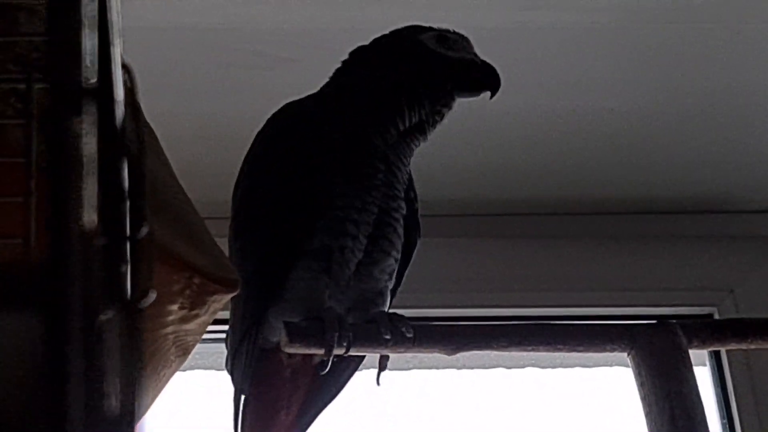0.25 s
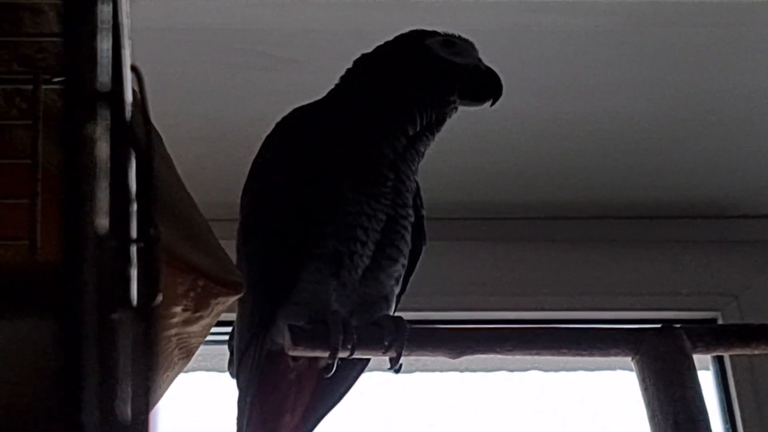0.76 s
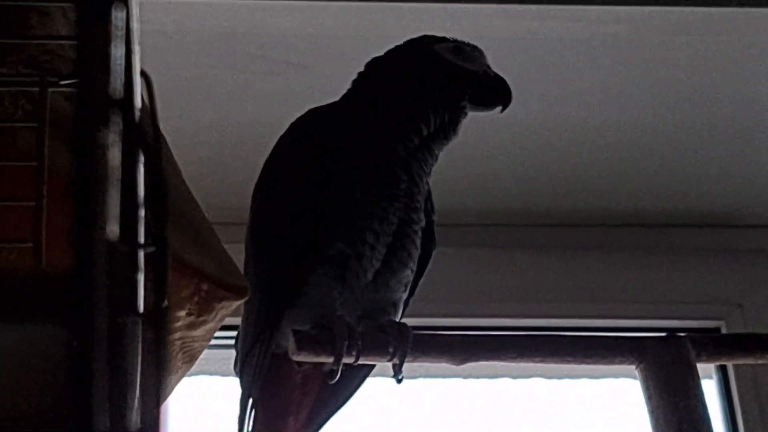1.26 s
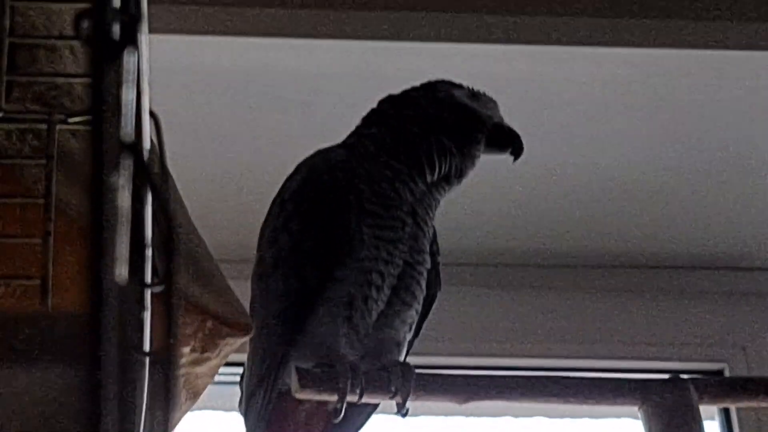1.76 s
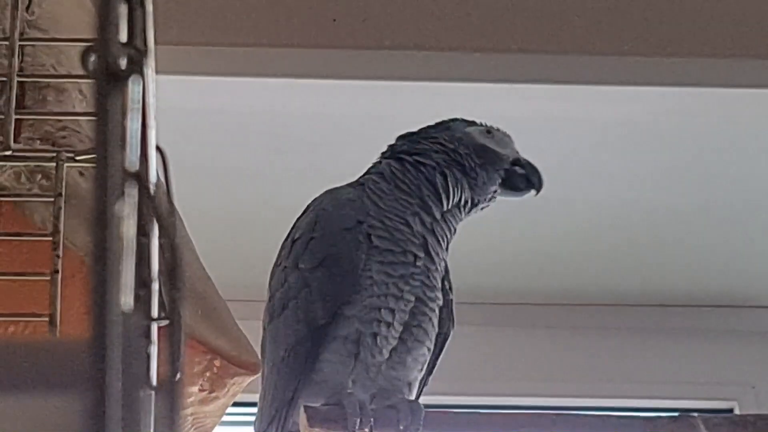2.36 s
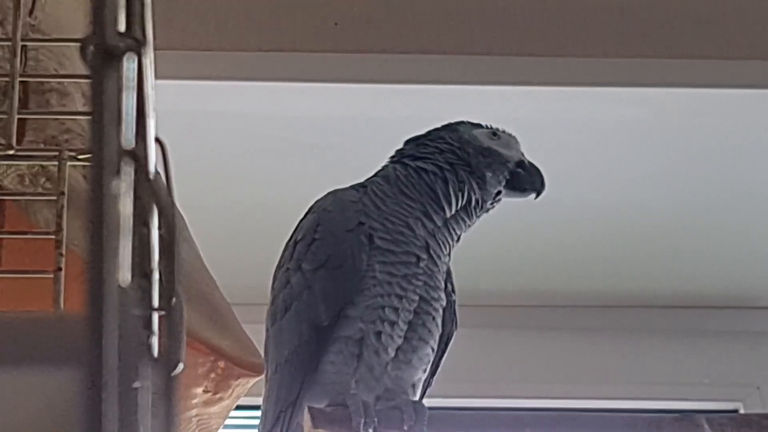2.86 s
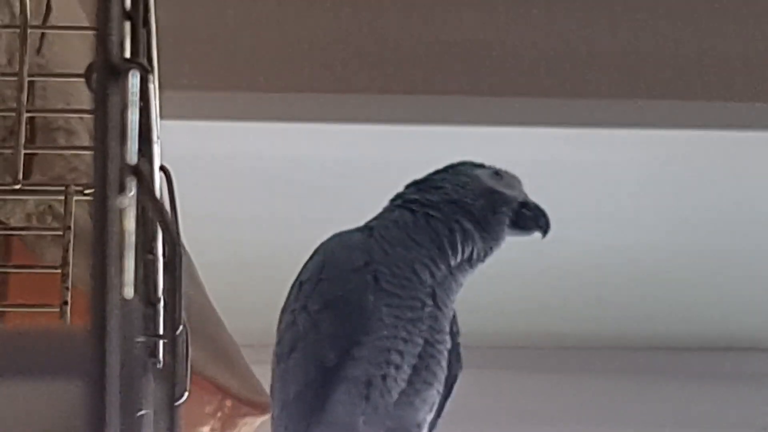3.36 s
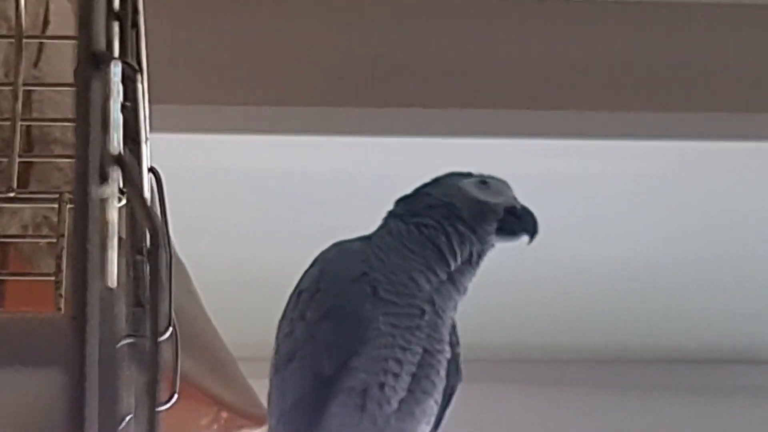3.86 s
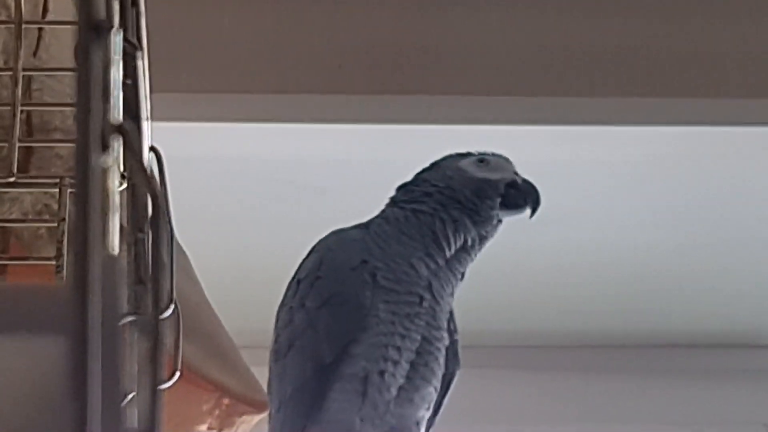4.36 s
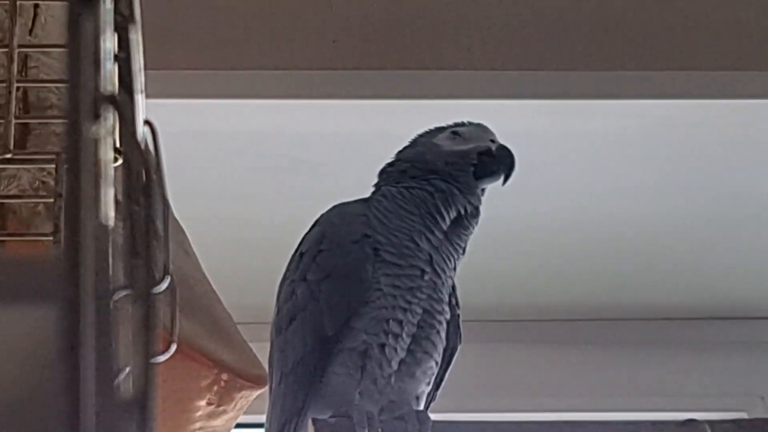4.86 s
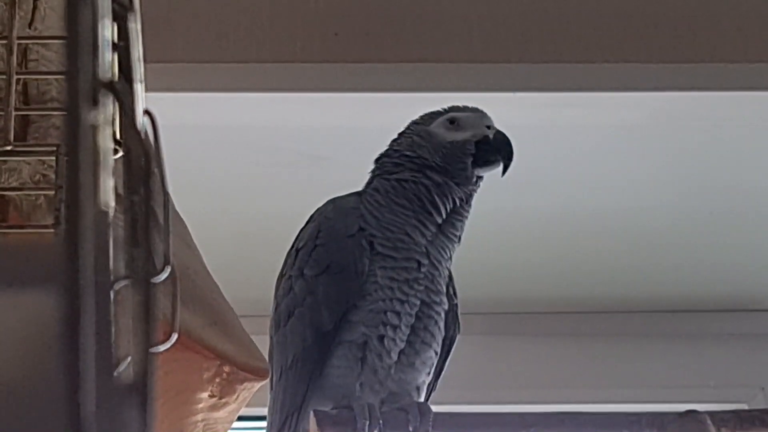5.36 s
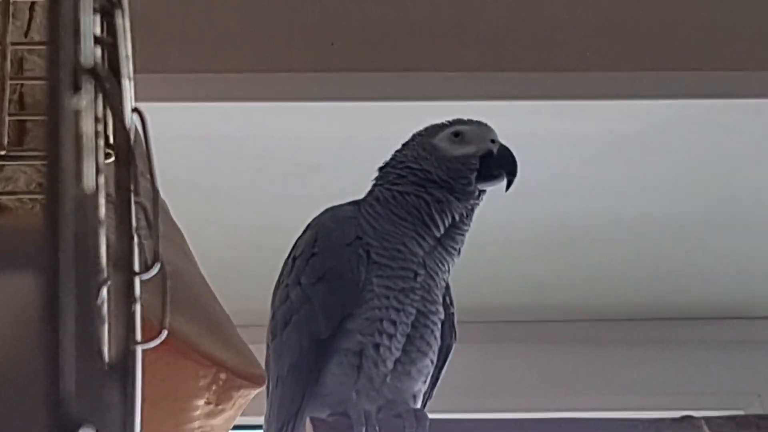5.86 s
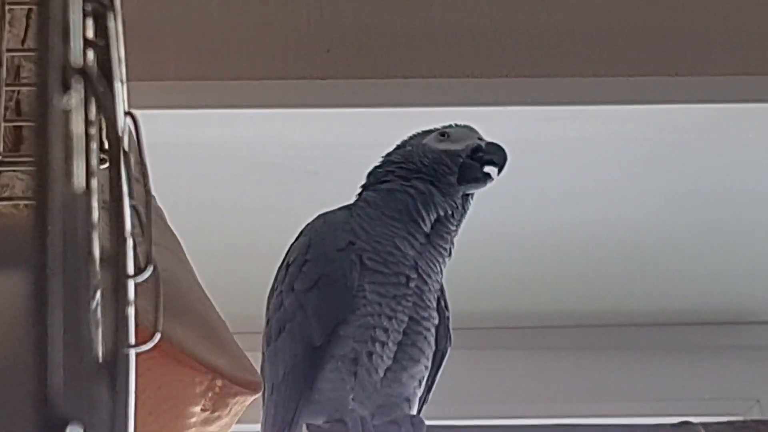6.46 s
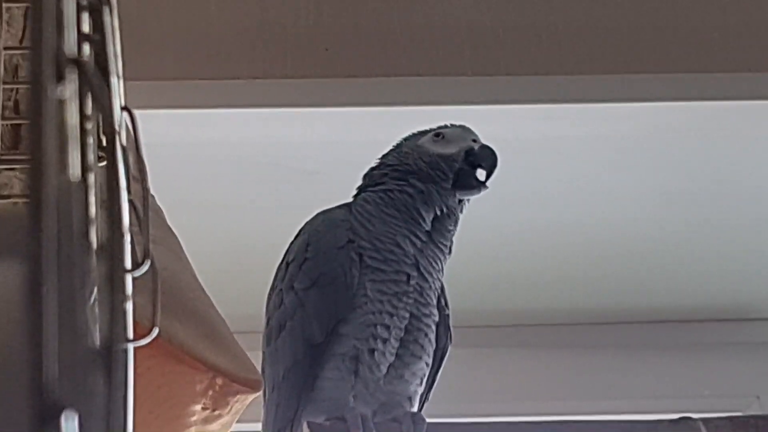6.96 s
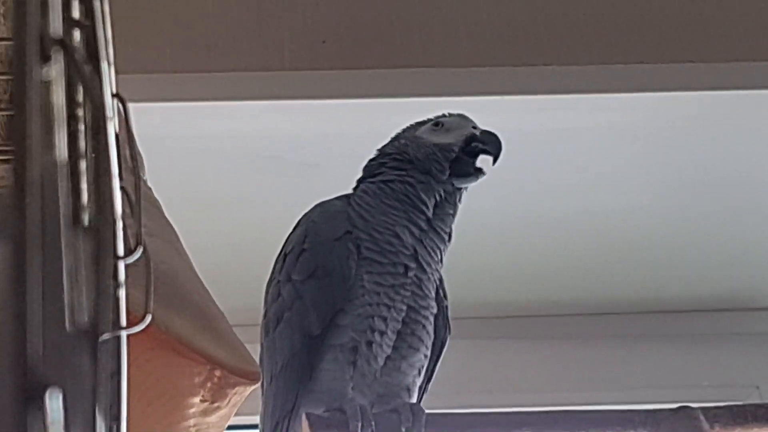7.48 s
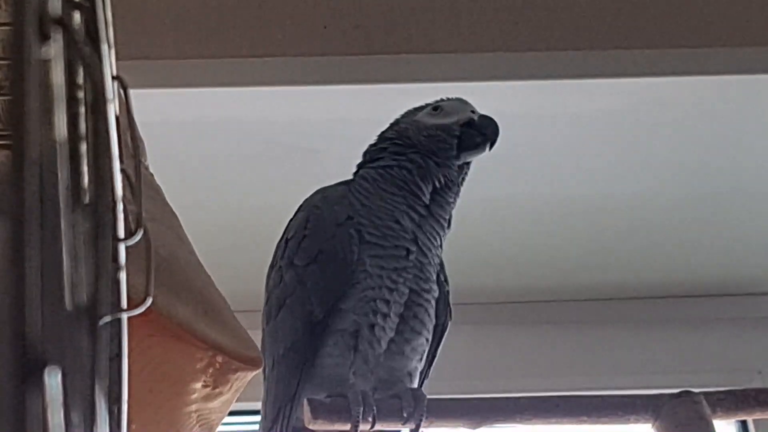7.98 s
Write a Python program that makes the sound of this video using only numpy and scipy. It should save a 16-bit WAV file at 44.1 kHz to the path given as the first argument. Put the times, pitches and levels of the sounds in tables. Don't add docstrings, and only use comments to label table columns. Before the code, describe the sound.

A grey parrot indoors gives brief gliding whistles, a piercing pure pipe, chirps, a squawk, a honk and beak clicks over faint hum and motor whine.

```python
import sys
import numpy as np
from scipy import signal
from scipy.fft import rfft, irfft, next_fast_len
from scipy.io import wavfile
from scipy.ndimage import uniform_filter1d, minimum_filter1d, map_coordinates

SR = 44100
rng = np.random.default_rng(int(sys.argv[2]) if len(sys.argv) > 2 else 0)


def to_linear_factor(level_db):
    exponent = np.asarray(level_db, float) / 20
    return 10 ** exponent


def generate_wav(sig):
    pcm = np.round(np.clip(np.atleast_2d(sig).T, -1, 1) * 32767).astype(np.int16)
    wavfile.write(sys.argv[1], SR, pcm)


N = 362634
TOP_HZ = 15740
PIPE_HZ = 2076
HZ = np.fft.rfftfreq(next_fast_len(N + SR), 1 / SR)

# (frequency [Hz], level [dB])
THROAT = [(500, 36), (1300, 0.5), (2200, 1), (3500, 0), (4300, -8), (5200, -11.5), (6400, 4.5), (7300, -2),
          (8500, -6), (12000, 2), (15500, -9)]


def unit(x):
    return x / np.sqrt(np.mean(x ** 2) + 1e-20)


def along(points, hz):
    f, v = np.transpose(points)
    return np.interp(np.log(hz + 1), np.log(f + 1), v)


def filtered(x, response):
    m = next_fast_len(N + SR)
    return irfft(rfft(x, m) * response, m)[..., :N]


def wobble(rate, size=N):
    knots = rng.standard_normal(int(size * rate / SR) + 4)
    return map_coordinates(knots, [np.arange(size) * rate / SR])


def panned(x, pan_db):
    return np.array([x * to_linear_factor(pan_db / 2), x * to_linear_factor(-pan_db / 2)])


def syrinx(notes, tract, slope_db, jitter, edge, most_air_db=np.inf, smear=0.018, flicker_db=3,
           reach=((0, 1, 0),), odd_db=4.0):
    out, airflow = np.zeros((2, N)), np.zeros((2, N))
    k = np.arange(3, 26)[:, None]
    for note in notes:
        s, *cols = np.transpose(note)
        a = round(s[0] * SR)
        t = np.arange(a, round(s[-1] * SR)) / SR
        since = t - s[0]
        hz, db, octave_db, over_db, air_db, pan_db = [np.interp(t, s, c) for c in cols]
        hz = hz * (1 + jitter * map_coordinates(rng.standard_normal(200), [since * 600]))
        phase = 2 * np.pi * np.cumsum(hz) / SR

        uneven_db = odd_db * rng.standard_normal(k.shape)
        stretch, lift_db = [row[1:] for row in reach if row[0] <= s[0]][-1]
        tract_db = along(tract, k * hz / stretch) + slope_db * np.log2(k / 2)
        over = to_linear_factor(over_db + lift_db + tract_db + uneven_db) * (k * hz < TOP_HZ)
        knots = np.broadcast_arrays(np.arange(len(k) + 1)[:, None], since * 50)
        flicker = to_linear_factor(flicker_db * map_coordinates(rng.standard_normal((len(k) + 1, 20)), knots))
        rasp = map_coordinates(rng.standard_normal(200), [since * 500])
        octave = to_linear_factor(octave_db) * flicker[0] * np.sin(2 * (phase + smear * rasp))
        overtones = np.sum(over * flicker[1:] * np.sin(k * (phase + smear * rasp * k / 3)), axis=0)
        tone = to_linear_factor(120 * jitter * rasp) * (np.sin(phase) + octave + overtones)

        fade = np.clip(np.minimum(since, s[-1] - t) / edge, 0, 1)
        hiss = to_linear_factor(db + np.minimum(air_db, most_air_db)) * fade
        out[:, a:a + len(t)] += panned(to_linear_factor(db) * fade * np.sqrt(2) * tone, pan_db)
        airflow[:, a:a + len(t)] += panned(hiss, pan_db)
    air = unit(filtered(rng.standard_normal(N), to_linear_factor(along(tract, HZ)) * (HZ > 1300)))
    return out + airflow * air


def voiced(notes, octave_db, over_db, air_db, pan_db, grow=0.6, opens_s=None):
    # (frequency [Hz], level [dB])
    mouth = [(700, 16), (1300, 3.5), (1900, 4.5), (2400, -1), (2800, 10), (3400, -28.5), (4200, 1),
             (6000, 0.5)]
    out = []
    for note in notes:
        s, hz, db = np.transpose(note)
        effort_db = grow * (db - db.max())
        opening = (s - s[0]) / (opens_s or s[-1] - s[0])
        second_db, upper_db, hiss_db = [
            np.interp(opening, np.linspace(0, 1, np.size(v)), np.atleast_1d(v))
            for v in (octave_db, over_db, air_db)]
        second_db = second_db + effort_db + along(mouth, 2 * hz)
        out.append(np.transpose([s, hz, db, second_db, upper_db + effort_db, hiss_db, pan_db + 0 * s]))
    return out


def sung(rows, bend, peak_at, swell_db, fade_db, **voice):
    u = np.linspace(0, 1, 25)
    level_db = np.interp(u, [0, peak_at, 1], [-swell_db, 0, -fade_db])
    return voiced([np.transpose([s + length * u, first * (last / first) ** u ** bend, db + level_db])
                   for s, length, first, last, db in rows], **voice)


def background():
    # (frequency [Hz], level [dB])
    air_colour = [(12, -36), (20, -11), (106, -11), (180, -5), (273, -3.5), (341, -6.5), (629, -9.5),
                  (808, -10.5), (1300, -15.5), (1810, -13.5), (2200, -18), (4290, -22.5), (7070, -28),
                  (9600, -29), (15400, -40.5)]
    # (frequency [Hz], left-right likeness [0..1])
    alike = [(30, 0.39), (60, 1), (180, 0.95), (550, 0.55), (1650, 0), (4970, 0.2), (15000, 0)]
    # (frequency [Hz], width [Hz], level [dB])
    hums = [(52.3, 4.5, -66), (100.2, 1.16, -54), (120.7, 3.7, -54.5), (285.2, 5.9, -48), (795, 30, -54.5)]
    turn = np.arccos(np.clip(along(alike, HZ), -1, 1)) / 2
    spread = to_linear_factor(along(air_colour, HZ)) * [np.cos(turn), np.sin(turn)]
    mid, side = filtered(rng.standard_normal((2, N)), spread)
    air = to_linear_factor(-44.5 + 2.3 * wobble(5)) * unit(np.array([mid + side, mid - side]))
    lines = sum(to_linear_factor(db) * unit(1 / (1 + ((HZ - hz) / width) ** 2)) for hz, width, db in hums)
    return air + filtered(rng.standard_normal(N) + 0.034 * rng.standard_normal((2, N)), lines)


def motor(gain):
    # (time [s], speed [turns/s])
    shaft = [(0, 252), (1, 254.5), (2.2, 256.6), (4, 258.6), (8.3, 258.7)]
    # (multiple, first level [dB], middle level [dB], last level [dB], share of the drift)
    whine = [(7, -39, -57, -49.5, 1.44), (16, -58, -57.5, -64.5, 1.67), (18, -54.5, -72, -60, 0.096),
             (21, -81, -76.5, -65.5, 0.46), (36, -78, -67.5, -60.5, -1.04)]
    # (multiple, first level [dB], settled level [dB], left-right [dB])
    weak_orders = [(1.007, -93, -53.5, 13), (9, -67, -75, 22.5), (10, -62, -72, 15), (11, -105, -70, 16),
                   (14, -98, -75, 17.5), (15, -67.5, -77.5, 17), (17, -94, -86, 0), (19, -104, -78, 31),
                   (24, -79.5, -75.5, 24), (25, -80.5, -84, 27), (45, -84, -80, -23)]
    # (time [s], level [dB])
    drift = [(.1, -17), (1.1, -8), (2.2, 0), (2.85, -1.5), (3.8, -1), (4.6, 4.5), (5.7, 0), (6.7, 2),
             (7.2, 3), (8.1, -1)]
    # (frequency [Hz], left-right [dB])
    whine_facing = [(4500, 5), (9000, -10)]
    middle_level_s = 2.38
    t = np.arange(N) / SR
    phase = 2 * np.pi * np.cumsum(np.interp(t, *np.transpose(shaft))) / SR
    drift_db = np.interp(t, *np.transpose(drift))
    loud = [(k, to_linear_factor(np.interp(t, [0, middle_level_s, t[-1]], db) + share * drift_db),
             along(whine_facing, k * shaft[-1][1])) for k, *db, share in whine]
    weak = [(k, gain * to_linear_factor(np.interp(t, [0, 1], db)), pan_db) for k, *db, pan_db in weak_orders]
    out = np.zeros((2, N))
    for k, level, pan_db in loud + weak:
        apart = np.array([[0], [min(.4 * k, np.pi / 2)]])
        swelling = panned(level * to_linear_factor(1.3 * wobble(3)), pan_db)
        out += np.sqrt(2) * swelling * np.sin(round(k) * phase + apart)
    return out


def whistles():
    # (start [s], length [s], first pitch [Hz], last pitch [Hz], peak [dB])
    slides = [
        (.23, 0.045, 1565, 852, -13.5),
        (.795, 0.024, 2024, 1654, -19.5),
    ]
    droops = [
        (.625, 0.035, 1387, 1345, -16.5),
        (3.202, 0.053, 844, 738, -27),
    ]
    flicks = [
        (3.088, 0.018, 2494, 2810, -10.5),
        (3.178, 0.022, 1063, 777, -24.5),
        (3.261, 0.041, 600, 510, -37),
        (3.303, 0.0172, 946, 1310, -16.5),
        (3.428, 0.03, 974, 1480, -22.5),
    ]
    # (time [s], pitch [Hz], level [dB])
    phrases = [
        [(.37, 1180, -41), (.394, 1135, -15), (.412, 1206, -11), (.424, 1079, -12.5), (.436, 961, -6),
         (.445, 735, -17.5)],
        [(.648, 1590, -5.5), (.656, 1870, -20), (.67, 1924, -5), (.685, 1730, -16), (.7, 1682, -4),
         (.712, 1540, -19.5), (.725, 1344, -8)],
    ]
    held = [
        [(.516, 1442, -22), (.528, 1373, -19), (.546, 1429, -6.5), (.556, 1414, -9.5), (.57, 1399, 4),
         (.585, 1400, -13), (.6, 1270, -5.5)],
    ]
    low_phrases = [
        [(1.255, 1275, -39), (1.285, 1047, -18), (1.303, 996, -8), (1.322, 917, -10), (1.335, 765, -24),
         (1.352, 664, -10.5)],
        [(1.518, 1021, -32), (1.56, 979, -13.5), (1.59, 945, -15.5), (1.601, 933, -21.5), (1.624, 891, -14),
         (1.634, 898, -5.5), (1.642, 902, -5), (1.652, 847, -18.5), (1.672, 691, -14)],
        [(1.8, 710, -46), (1.845, 563, -34.5), (1.868, 453, -18.5), (1.885, 380, -35.5)],
    ]
    # (from time [s], resonance factor, overtone lift [dB])
    throat_reach = [(0, 1.08, 3), (.33, 1.05, 0.5), (.5, 1.09, -2.5), (.64, 1.07, -9), (.75, 0.84, -24),
                    (1.2, 1.06, -1.5), (1.45, 0.925, -1.5), (1.75, 2, -9.5), (2.9, 1.03, 10)]
    notes = voiced(held, octave_db=(-25, -18.5, -32), over_db=(-23.5, -27, -34.5), grow=0.292,
                   air_db=(-54, -51), pan_db=7.5)
    notes += sung(droops, bend=5.9, peak_at=0.54, swell_db=12, fade_db=-1, octave_db=-31.5,
                  over_db=-42.5, air_db=(-24, -40.5), pan_db=4.5)
    notes += sung(slides, bend=1.28, peak_at=0.43, swell_db=23.5, fade_db=2.5, octave_db=-16,
                  over_db=-31, air_db=(-53, -39), pan_db=8)
    notes += sung(flicks, bend=1.115, peak_at=0.16, swell_db=-9.5, fade_db=5, octave_db=-53,
                  over_db=-71, air_db=(-37, -28.5), pan_db=6)
    notes += voiced(phrases, octave_db=(-12.5, -28.5), over_db=(-22.5, -35.5), grow=0.12,
                    air_db=(-31.5, -48), pan_db=6.5)
    notes += voiced(low_phrases[::2], octave_db=(-17.5, -17, -30), over_db=(-55, -61, -35.5, -30),
                    grow=0.08, air_db=(-30.5, -28), pan_db=6.5)
    notes += voiced(low_phrases[1:2], octave_db=(-50, -47, 5.5, -29, -19),
                    over_db=(-64, -80, -22, -33.5, -30), grow=0.061, air_db=(-40.5, -29.5), pan_db=2.5)
    return syrinx(notes, THROAT, slope_db=-3, jitter=.004, edge=.004, most_air_db=-26, smear=.1,
                  flicker_db=4, reach=throat_reach, odd_db=1)


def smacks():
    # (time [s], peak [dB], mouth resonance [Hz], length [s])
    dry_clacks = [(0.266, -31.5, 642, 0.016), (3.419, -29.5, 502, 0.0063), (6.983, -25, 2300, 0.0066),
                  (7.817, -23, 3370, 0.013), (7.463, -38, 3320, 0.01), (1.251, -45, 2480, .03),
                  (1.263, -25.5, 1686, 0.017), (2.397, -27, 2040, 0.008), (2.405, -10, 1650, 0.0097),
                  (2.411, -23.5, 850, 0.0035), (2.413, -5.5, 1820, 0.0039), (2.414, -6.5, 2330, 0.0063),
                  (2.416, -13, 1750, 0.0017), (2.419, -12.5, 2360, 0.0043), (7.297, -38, 1615, 0.019),
                  (7.308, -36, 2180, 0.013), (7.31, -39, 3080, 0.013), (7.33, -39.5, 2330, .012),
                  (7.83, -22, 1690, 0.012), (7.832, -13.5, 2880, 0.012), (7.834, -13, 1750, 0.0087),
                  (7.8381, -11.5, 2420, 0.0022), (7.839, -12.5, 2044, 0.013), (7.842, -15, 2870, 0.0024),
                  (7.8444, -5, 2380, 0.0032), (7.847, -15, 2545, 0.0076), (7.85, -22, 1900, .004),
                  (7.856, -15, 2110, 0.0057), (7.87, -29, 2420, .005)]
    wet_smacks = [(7.423, -48, 1780, 0.042), (7.457, -36, 1600, 0.0058), (7.462, -30, 1510, 0.014),
                  (7.472, -32, 1830, 0.0034), (7.48, -20, 1660, 0.0076), (7.488, -32, 2270, 0.01),
                  (7.484, -32.5, 976, 0.014), (7.801, -38, 1660, 0.016), (7.811, -22, 1640, 0.0087),
                  (7.823, -31, 1840, 0.002), (7.828, -26, 1080, 0.012)]
    # (frequency [Hz], level [dB])
    puff_colour = [(500, -40), (1000, -10), (1700, 0), (2600, 0), (3700, -3), (4500, -17), (6000, -23),
                   (7000, -38), (8500, -30), (11000, -30), (15500, -50)]
    clack_db, smack_db = (-22.5, -16), (-0.5, -1.5)
    events = [(*r, *clack_db) for r in dry_clacks] + [(*r, *smack_db) for r in wet_smacks]
    out, puff = np.zeros(N + SR), np.zeros(N + SR)
    t = np.arange(SR // 20) / SR
    for s, db, hz, length, upper_db, puff_db in events:
        u = 6 * t / length
        shape = (u / 2) ** 2 * np.exp(2 - u)
        ring = np.sin(2 * np.pi * hz * t) + to_linear_factor(upper_db) * np.sin(2 * np.pi * 3400 * t)
        out[round(s * SR):][:len(t)] += to_linear_factor(db) * shape * ring
        puff[round(s * SR):][:len(t)] += to_linear_factor(db + puff_db) * shape
    air = unit(filtered(rng.standard_normal(N), to_linear_factor(along(puff_colour, HZ))))
    return panned(out[:N] + puff[:N] * air, 0.96)


def long_whistle():
    # (time [s], pitch [Hz], level [dB])
    pipe_notes = [
        [(2.412, PIPE_HZ, -13.5), (2.428, PIPE_HZ, -5.5), (2.448, PIPE_HZ, 3), (2.458, PIPE_HZ, -26),
         (2.469, PIPE_HZ, -1), (2.488, PIPE_HZ, -6.5), (2.507, PIPE_HZ, -50), (2.52, PIPE_HZ, -23.5),
         (2.76, PIPE_HZ, -67.5)],
    ]
    # (frequency [Hz], level [dB])
    pipe_tract = [(1300, -44), (2900, -72), (3500, -45), (4000, -25), (4600, -14.5), (5200, -26),
                  (6228, -21.5), (8304, -30), (10380, -31.5), (12456, -39), (14532, -42)]
    twist = -3
    notes = voiced(pipe_notes, octave_db=(-34, -15, -18.5), over_db=(-17, 2.5, -3), grow=0.086,
                   air_db=(-9.5, -24, -27.5), pan_db=0.5, opens_s=0.048)
    pipe = syrinx(notes, pipe_tract, slope_db=0, jitter=.0006, edge=.004, smear=.01)
    return filtered(pipe, np.exp(1j * twist * (HZ > 1.5 * PIPE_HZ) * [[.5], [-.5]]))


def chirps():
    # (start [s], length [s], first pitch [Hz], last pitch [Hz], peak [dB])
    chirp_rows = [
        (2.993, 0.059, 5960, 5760, -30),
        (3.05, 0.051, 4800, 4760, -26),
        (3.068, 0.033, 3985, 4010, -19.5),
    ]
    # (frequency [Hz], level [dB])
    beak = [(2300, -68), (3200, 29.5), (5000, 19.5), (6500, -18), (7500, -21), (9500, -23), (13000, 3.5)]
    notes = sung(chirp_rows, bend=1.1, peak_at=.3, swell_db=7, fade_db=10, octave_db=-28, over_db=-31,
                 air_db=(-10, -1), pan_db=4)
    return syrinx(notes, beak, slope_db=-3, jitter=.03, edge=.003)


def rough_notes():
    # (time [s], pitch [Hz], level [dB])
    hooks = [
        [(3.003, 3470, -50), (3.013, 3475, -18), (3.018, 3090, -16), (3.036, 3086, -13), (3.046, 3110, -20.5),
         (3.051, 3430, -12), (3.058, 3030, -36), (3.085, 2980, -19)],
    ]
    landings = [
        [(3.101, 1790, -34), (3.107, 1735, -0.5), (3.112, 1740, -16.5), (3.119, 1630, -9.5), (3.126, 1334, -12),
         (3.131, 1447, 2.5), (3.136, 1310, -2.5), (3.142, 1407, -5), (3.158, 1473, -9.5)],
    ]
    notes = voiced(hooks, octave_db=-32, over_db=-35.5, grow=0.26, air_db=(-25, -20), pan_db=3)
    notes += voiced(landings, octave_db=-40, over_db=-38, grow=0.37, air_db=(-32, -19), pan_db=6.5)
    return syrinx(notes, THROAT, slope_db=-3, jitter=.009, edge=.004, most_air_db=-27)


def squawk():
    # (time [s], level [dB], rate [pulses/s])
    pulses = [
        (4.004, -59, 270),
        (4.017, -27.5, 228),
        (4.027, -23, 200),
        (4.029, -19.5, 300),
        (4.1, -23.5, 245),
        (4.122, -28, 157),
    ]
    # (frequency [Hz], level [dB])
    squawk_colour = [(150, -26.5), (600, -20.5), (730, -10), (850, -18), (1000, -5.5), (1300, -14.5),
                     (1850, -5), (2700, -19), (3450, -15), (4600, -27), (6100, -27), (7100, -33),
                     (8000, -27), (15500, -48)]
    s, db, rate = np.transpose(pulses)
    t = np.arange(N) / SR
    cycle = np.cumsum(np.interp(t, s, rate) * (1 + .06 * wobble(150))) / SR
    slaps = np.diff(np.floor(cycle), prepend=0) * to_linear_factor(2.1 * wobble(250))
    air = rng.standard_normal(N) * np.exp(-3 * (cycle % 1))
    source = unit(filtered(unit(slaps) + 6.9 * unit(air), to_linear_factor(along(squawk_colour, HZ))))
    return panned(source * to_linear_factor(np.interp(t, s, db, -120, -120) - 5.5), 6.4)


def honks():
    # (time [s], pitch [Hz], level [dB])
    honk_notes = [
        [(4.945, 652, -29), (4.962, 671, -23), (4.976, 642, -17), (4.994, 666, -18), (5.012, 656.6, -25.5),
         (5.03, 666.7, -14), (5.046, 669, -24.5), (5.06, 640, -41), (5.078, 650, -60)],
    ]
    # (frequency [Hz], level [dB])
    nose = [(1450, -22), (1980, 0), (2640, -9), (3300, -14), (3960, -16), (4620, -28), (5280, -28),
            (5940, -27), (6600, -13), (7900, -18), (8600, -28), (10600, -25), (11250, -39), (11900, -17),
            (12600, -20), (14500, -40), (15300, -20)]
    notes = voiced(honk_notes, octave_db=(-22, -14, -25, -6, -9), over_db=(-26, -9.5, -1, -20.5, -18),
                   grow=0.5, air_db=(-38, -42), pan_db=4.5)
    return syrinx(notes, nose, slope_db=0, jitter=.0015, edge=.01, smear=.01, flicker_db=5)


def murmurs():
    # (time [s], pitch [Hz], level [dB])
    murmur_notes = [
        [(6.32, 342, -47), (6.352, 371, -34), (6.378, 362.4, -31), (6.414, 372.7, -43.5), (6.442, 366.6, -37),
         (6.495, 360, -69)],
    ]
    # (frequency [Hz], level [dB])
    muted = [(1100, -0.5), (1500, -34), (2200, -29), (4000, -50)]
    notes = voiced(murmur_notes, octave_db=(-23, -16, -9.5, -2), over_db=(0.5, -12), grow=.1,
                   air_db=(-36, -34), pan_db=4.5)
    return syrinx(notes, muted, slope_db=0, jitter=.003, edge=.01)


def tongue_pops():
    # (time [s], pitch [Hz], level [dB])
    pop_notes = [
        [(6.8375, 1570, -21), (6.8425, 1699, -1.5), (6.851, 1687, -12), (6.862, 1710, -38)],
        [(6.98, 2100, -22), (6.986, 1700, -7.5), (6.991, 1920, -20), (6.996, 2160, -29), (7.004, 2046, -24),
         (7.012, 2150, -27)],
    ]
    notes = voiced(pop_notes, octave_db=-61, over_db=-50, grow=.5, air_db=(-48, -55), pan_db=2)
    return syrinx(notes, THROAT, slope_db=-3, jitter=0, edge=.002)


def room(x):
    # (frequency [Hz], decay by 60 dB [s])
    decay = [(500, 0.26), (1320, 0.32), (2100, 0.26), (3480, 0.25), (9190, 0.19)]
    hz, t, z = signal.stft(rng.standard_normal((2, SR // 2)), SR, nperseg=256)
    tail = signal.istft(z * to_linear_factor(-60 * t / along(decay, hz)[:, None]), SR, nperseg=256)[1]
    tail = np.pad(tail / np.linalg.norm(tail[0]), ((0, 0), (150, 0)))
    return signal.fftconvolve(x, tail, axes=1)[:, :N]


def ducking(x):
    slope, knee_db, recover_s, open_db = 0.78, -22, 1, 1
    keep = np.exp(-1 / (recover_s * SR))
    held_power = signal.lfilter([1 - keep], [1, -keep], np.mean(x ** 2, axis=0))
    return to_linear_factor(open_db) * (1 + held_power / to_linear_factor(2 * knee_db)) ** (-slope / 2)


def aimed(x):
    # (from time [s], left lag [ms], left-right [dB])
    bearing = [(0, -0.122, -2.5), (0.501, 0.14, -1.5), (0.621, -0.114, -2), (1.1, 0.33, 1),
               (1.48, -0.27, 3.5), (1.77, 0.27, 3), (2.2, -0.119, 2), (2.9, -0.23, 4), (3.1, 0.087, -4),
               (3.17, -.2, 3), (3.9, -0.071, 0), (4.8, -.35, -2.5), (6.1, 0.19, 2.5), (6.7, -0.09, 2),
               (7.2, -0.088, 7)]
    turn_s = .006
    s, lag_ms, pan_db = np.transpose(bearing)
    n, side = np.arange(N), np.array([[.5], [-.5]])
    now = np.searchsorted(s * SR, n, side="right") - 1
    lag_ms, pan_db = [uniform_filter1d(v[now], size=round(turn_s * SR)) for v in (lag_ms, pan_db)]
    heard = [map_coordinates(v, [n - half * lag_ms * SR / 1000]) for v, half in zip(x, side)]
    return np.array(heard) * to_linear_factor(side * pan_db)


def scene():
    # (frequency [Hz], left-right [dB])
    facing = [(1500, -5), (5000, 3), (9000, -4), (15000, -15.5)]
    # (frequency [Hz], level [dB])
    lift = [(12000, 0), (14000, 0), (15700, -9)]
    # (frequency [Hz], level [dB])
    honk_echo = [(700, 1), (1300, 3.5), (3000, 0)]
    # (time [s], level [dB])
    wall_send = [(.5, 1), (.52, -12), (.59, -6.5), (.62, 1), (.65, 0.5), (1.27, 1), (1.29, -3), (1.325, -1),
                 (1.335, 6.5), (1.5, -9), (1.63, -12.5), (1.654, 4), (3, -2), (3.05, 0.5), (3.06, 4.5),
                 (3.116, 0), (3.125, 1), (3.16, -16), (3.17, 1)]
    bird = whistles() + smacks() + chirps() + rough_notes() + squawk() + murmurs()
    pipe, honk, pops = long_whistle(), honks(), tongue_pops()
    calls = bird + pipe + pops + honk
    gain = ducking(calls)
    colour = to_linear_factor(along(lift, HZ) + along(facing, HZ) * [[.5], [-.5]])

    to_walls = bird * to_linear_factor(np.interp(np.arange(N) / SR, *np.transpose(wall_send)))
    to_walls += to_linear_factor(-6) * pipe + to_linear_factor(-5) * pops
    to_walls += to_linear_factor(1) * filtered(honk, to_linear_factor(along(honk_echo, HZ)))
    echoes = to_linear_factor([[-5], [-3.5]]) * room(filtered(to_walls, colour))
    return aimed(filtered(calls, colour)) + echoes + gain * background() + motor(gain)


def roll_off(x):
    return signal.sosfilt(signal.butter(12, 15810, fs=SR, output="sos"), x)


def record(dry):
    needed = np.minimum(1, .99 / (np.abs(dry).max(axis=0) + 1e-9))
    gain = uniform_filter1d(minimum_filter1d(needed, size=441), size=221)
    return roll_off(filtered(dry * gain, HZ < TOP_HZ))


dry = scene()
out = record(dry)
generate_wav(out)
```